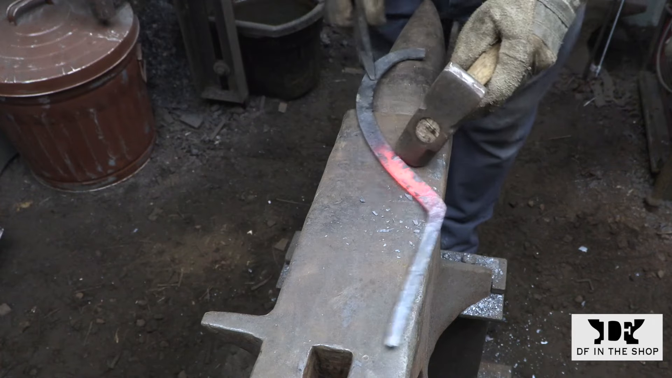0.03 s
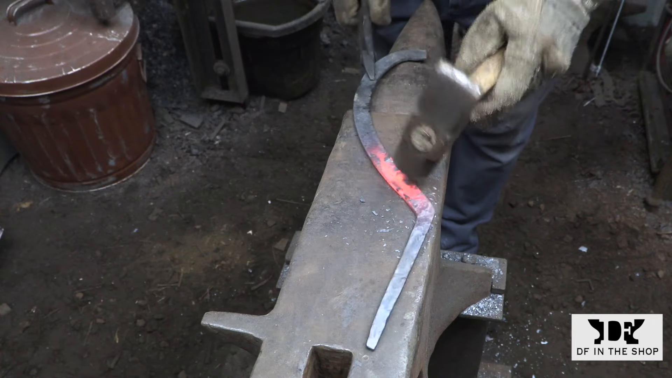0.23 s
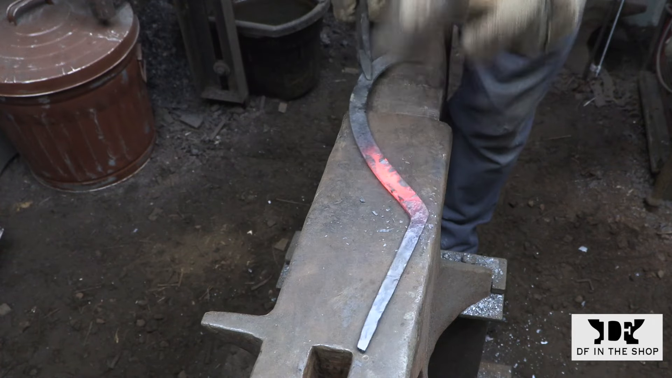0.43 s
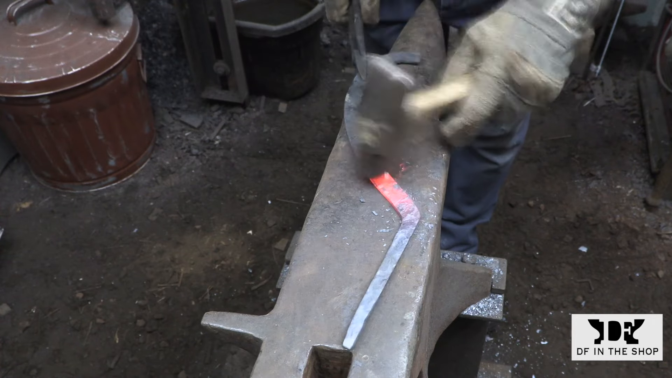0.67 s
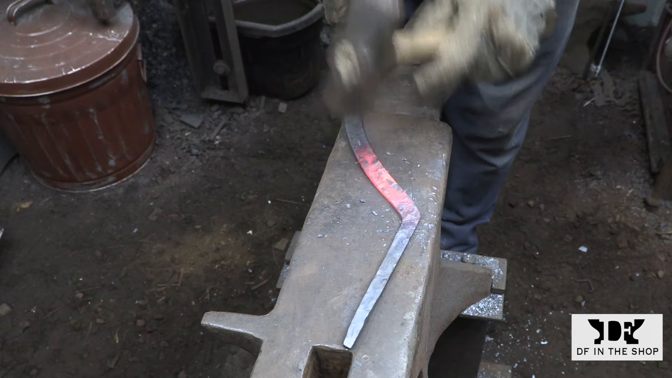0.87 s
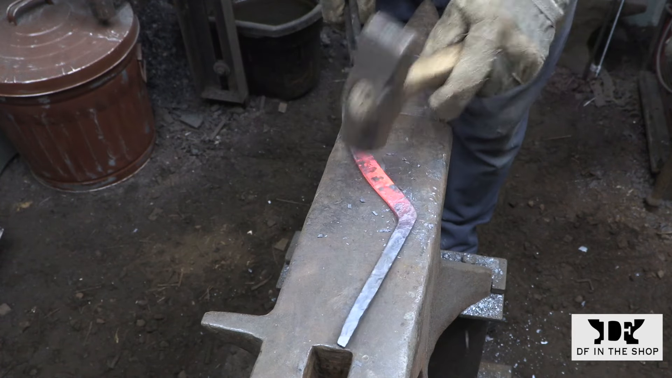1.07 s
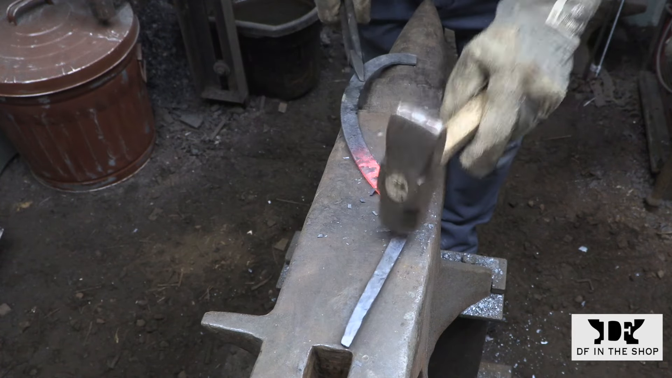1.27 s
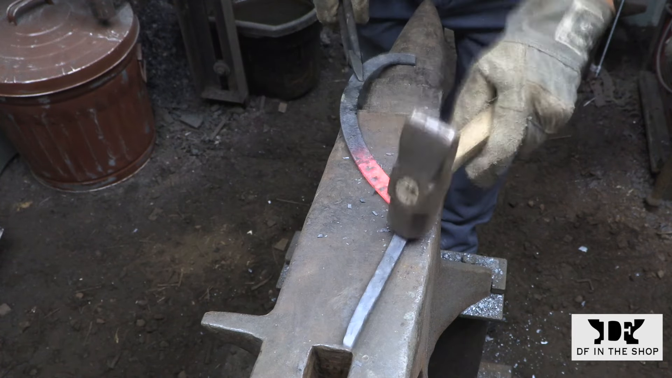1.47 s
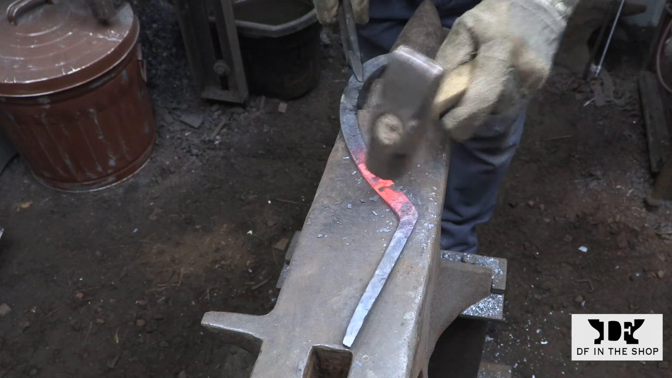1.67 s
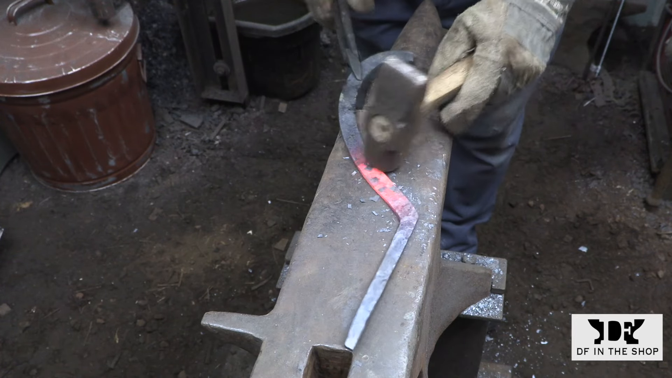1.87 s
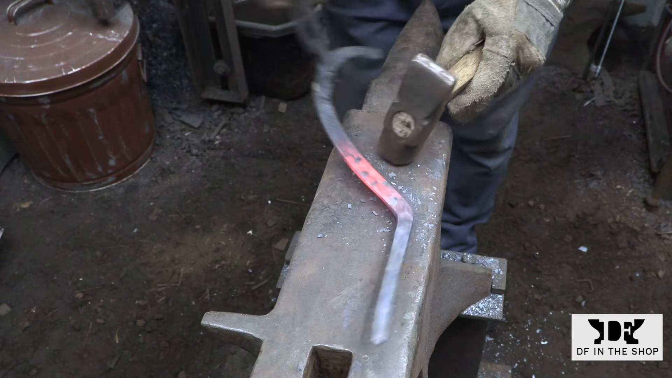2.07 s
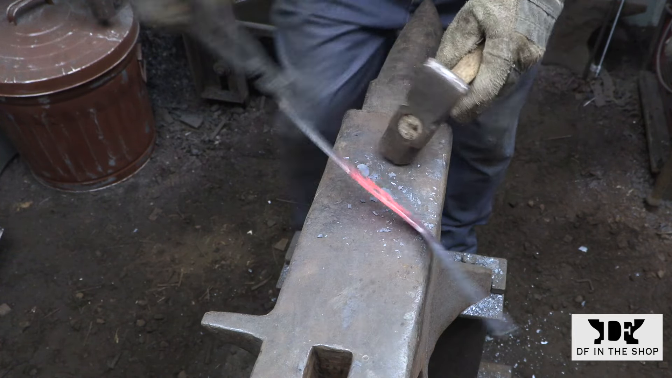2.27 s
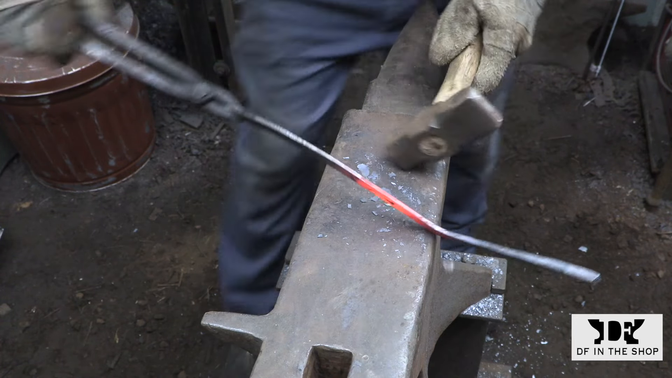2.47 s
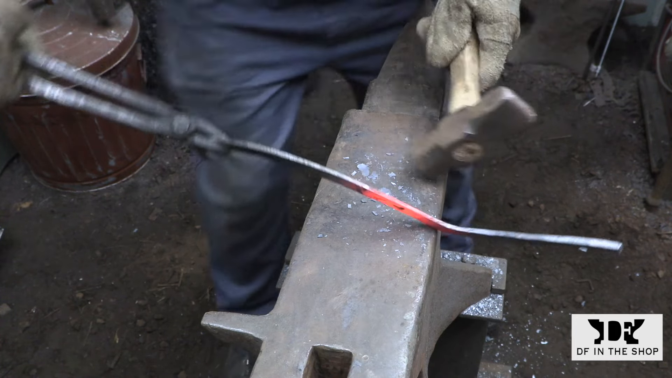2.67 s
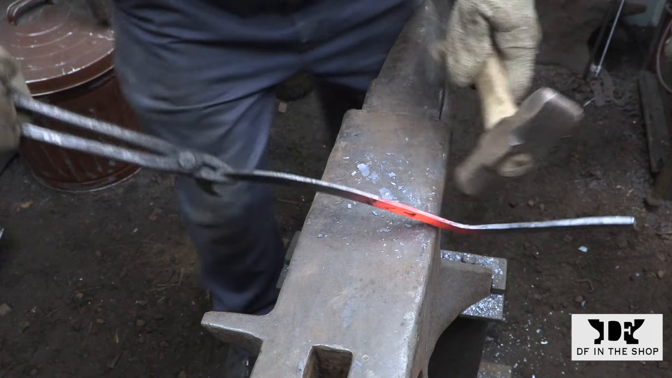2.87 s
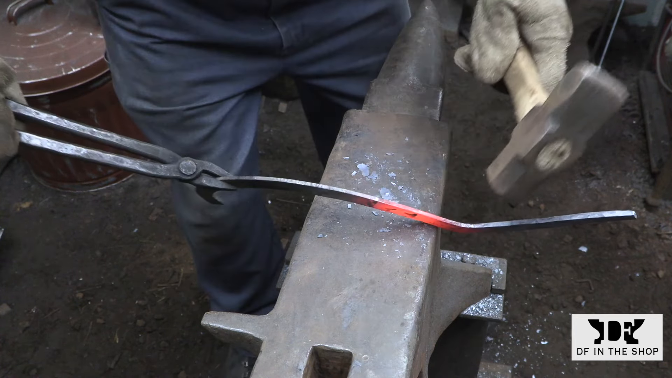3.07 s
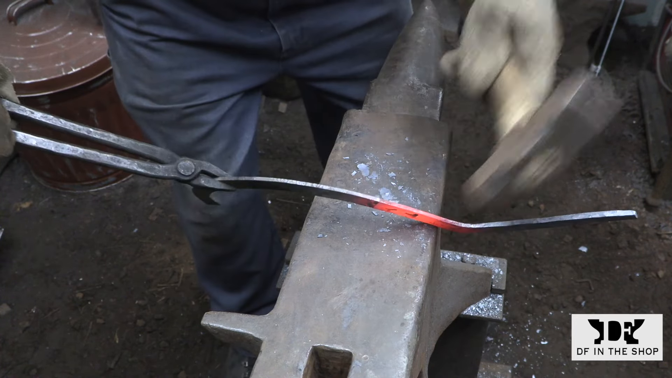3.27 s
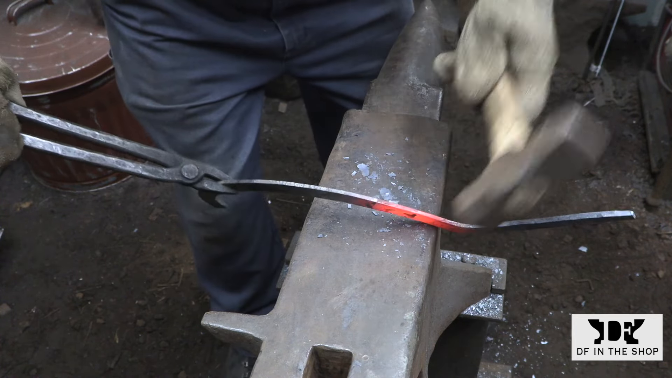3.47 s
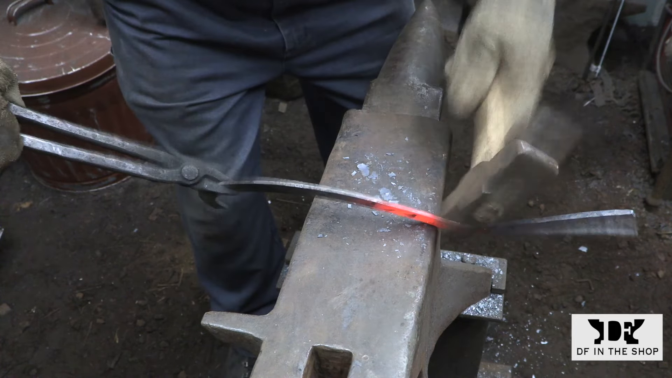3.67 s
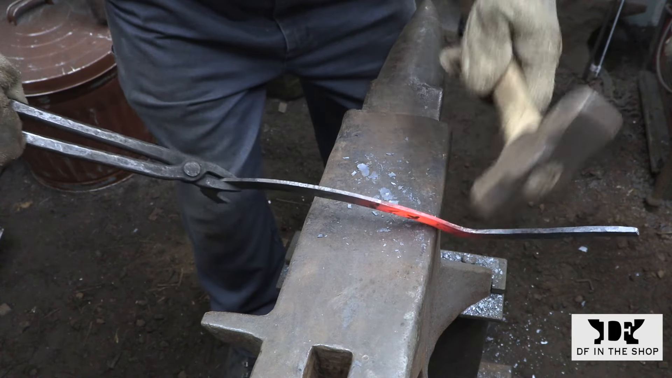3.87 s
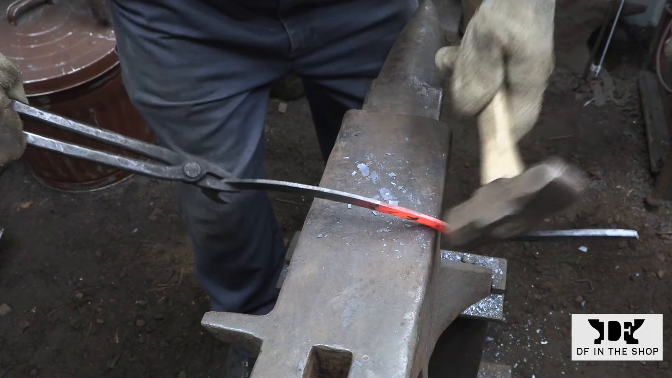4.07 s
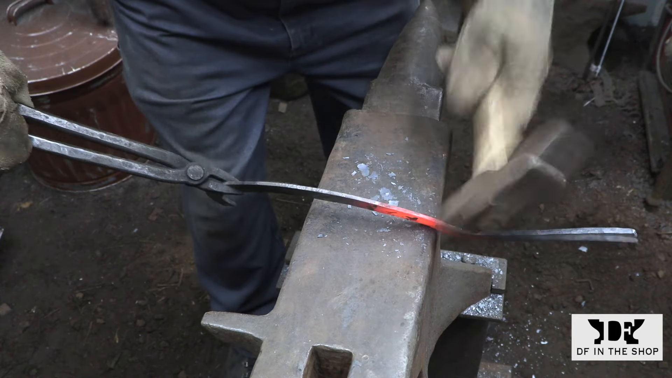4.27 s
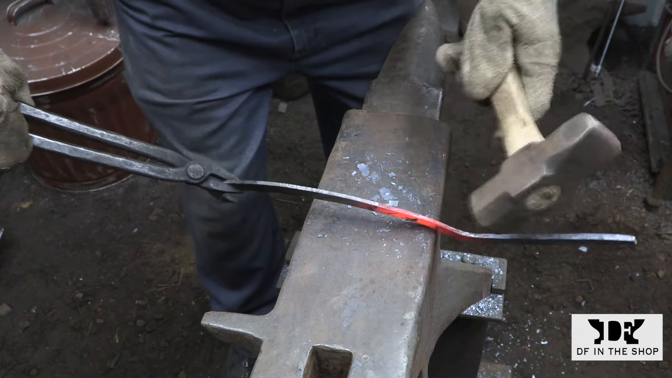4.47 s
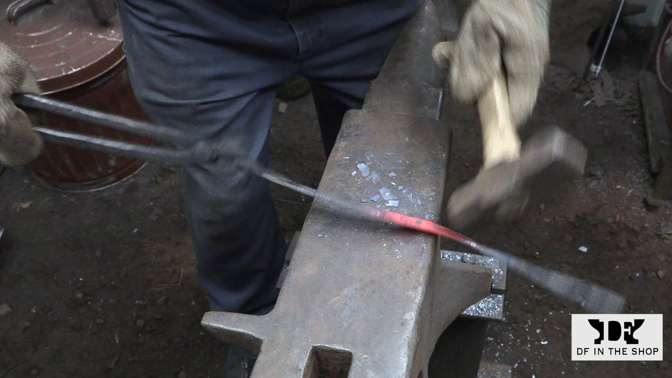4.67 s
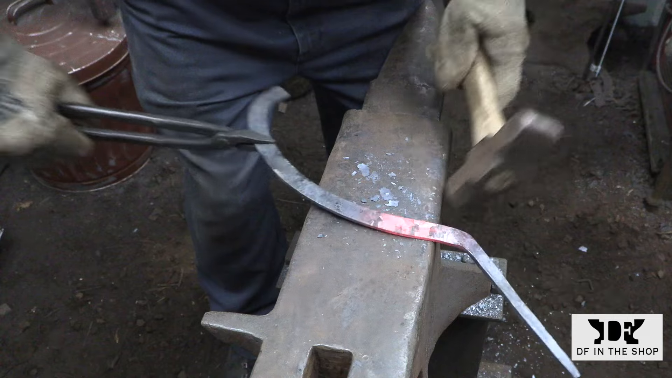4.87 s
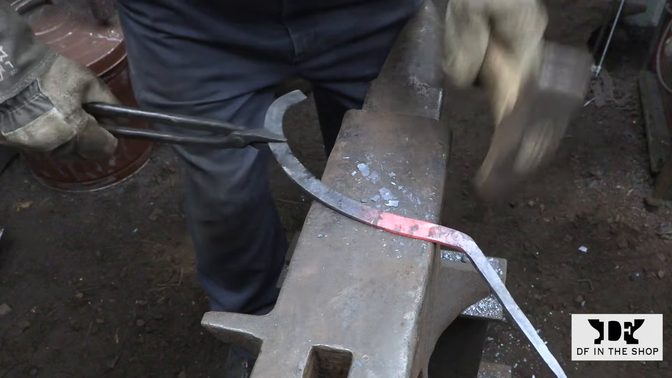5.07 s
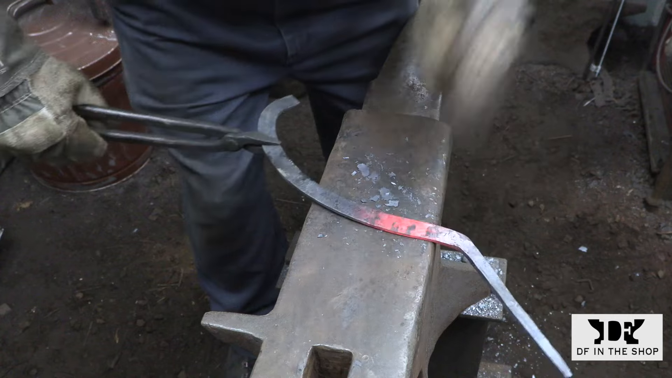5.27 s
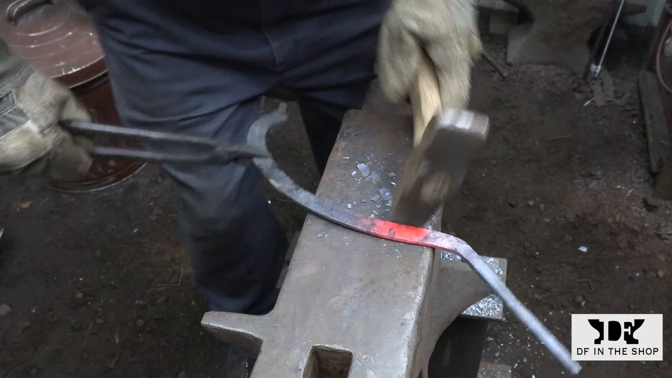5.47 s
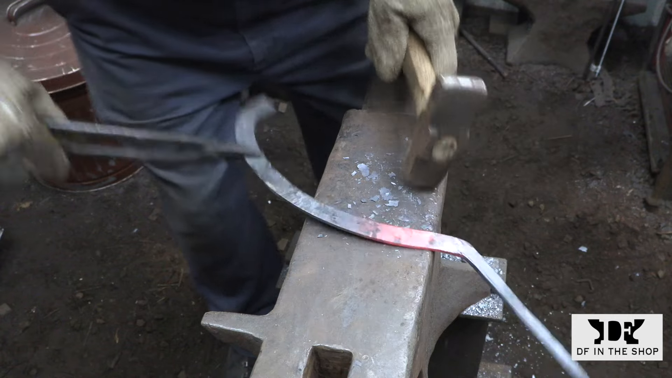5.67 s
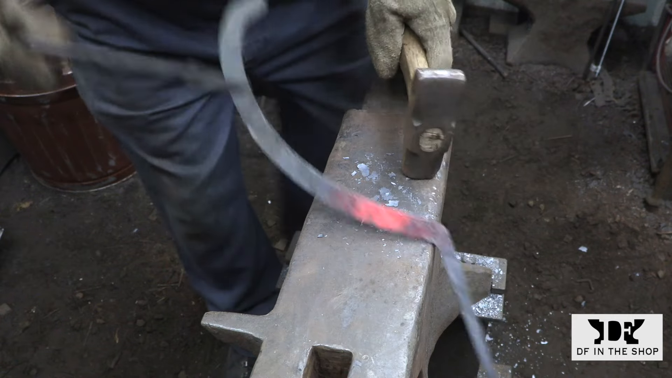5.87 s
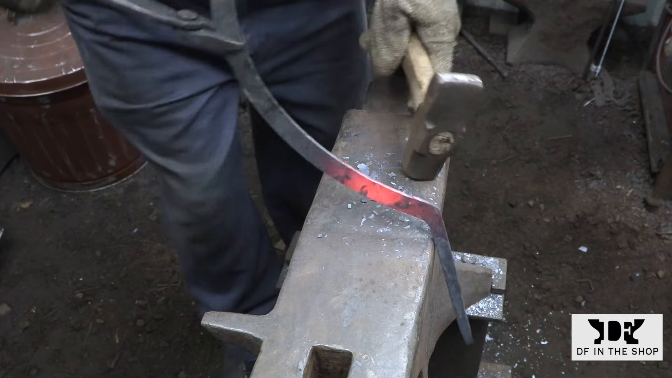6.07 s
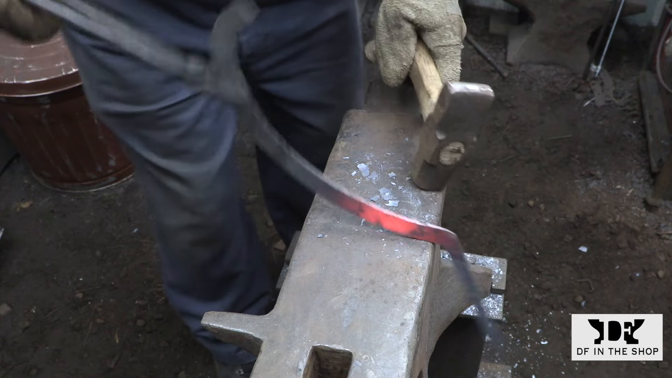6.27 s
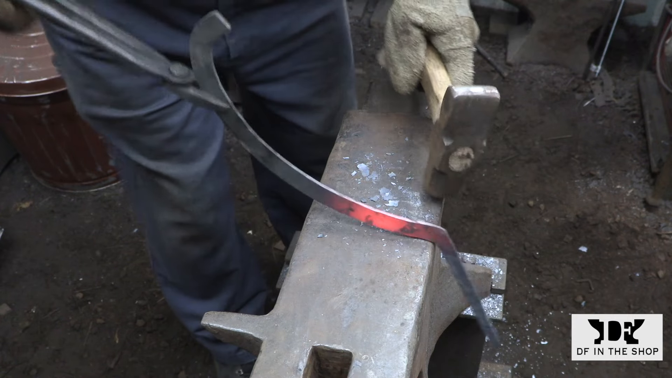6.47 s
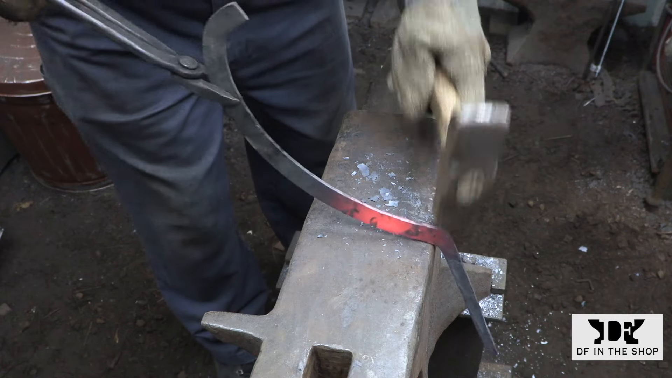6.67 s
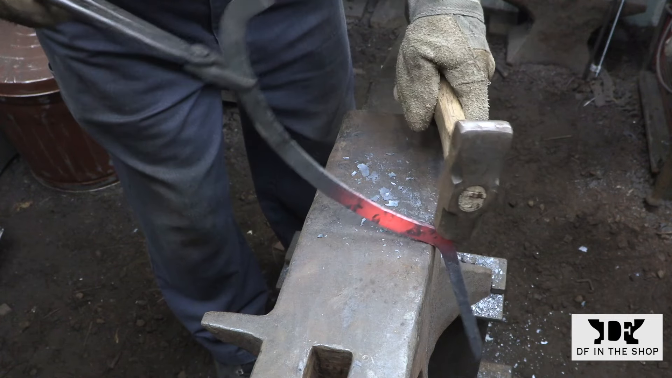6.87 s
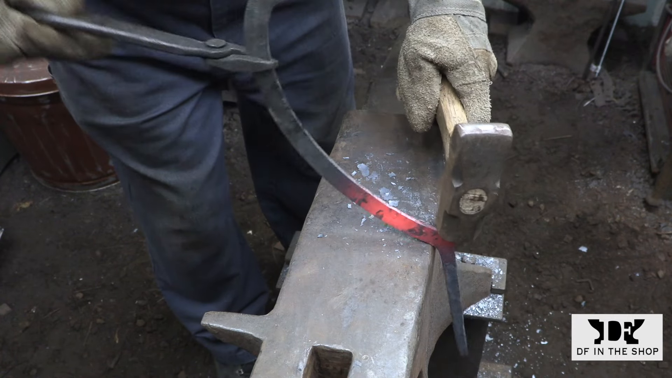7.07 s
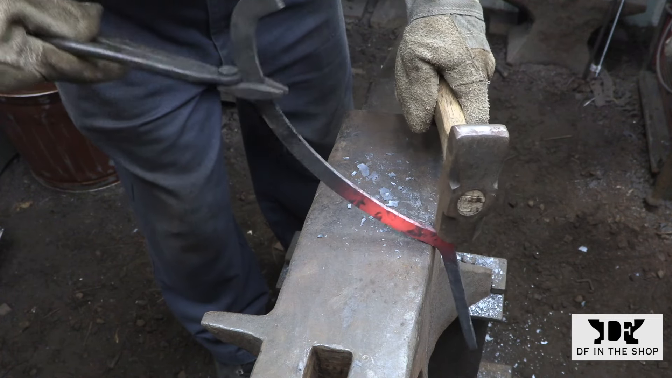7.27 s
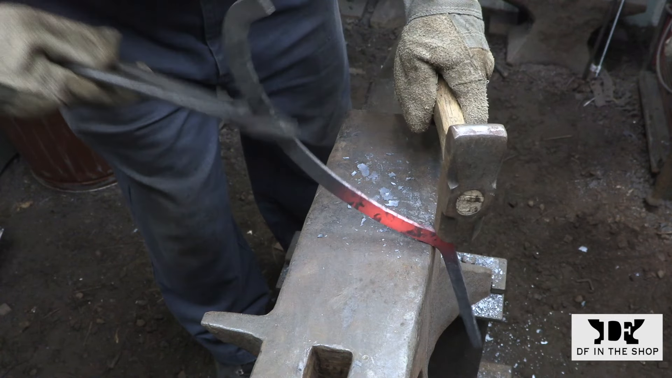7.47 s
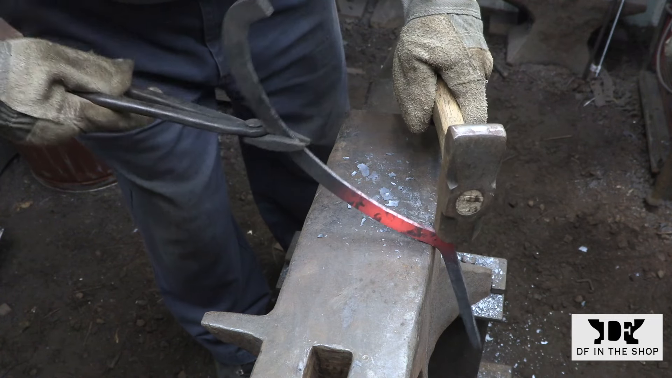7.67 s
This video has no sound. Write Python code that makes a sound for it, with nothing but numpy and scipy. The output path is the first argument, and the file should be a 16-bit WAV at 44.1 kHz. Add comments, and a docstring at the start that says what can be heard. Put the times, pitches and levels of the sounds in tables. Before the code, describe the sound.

Close stereo microphones in a small quiet workshop with faint air noise and hum. After a small foot scuff, a run of bright hammer blows clangs on an anvil, each ring dying quickly. The bar twangs and shifts with light knocks, then a drier, clackier run follows. One hard ringing blow stands out among dull taps, then the bar scrapes across the steel, and a last light tap gives way to soft dragging.

```python
"""A smith hammers a hot steel bar on a well-damped anvil in a small workshop, close to two microphones.
Over faint air noise and a hum, feet shuffle and small contacts knock: grains of noise, and ticks with dying modes.
Then runs of blows: each is a sharp noise crack, a short ring of anvil and hammer, and the clatter of the room.
Between the first two runs the bar twangs, shifts and knocks; in and after the last run come faint swishes, as of
a sleeve, then the dragged bar, in rasp and hiss made of tiny slips. A fast limiter flattens the hard blows."""
import sys
import numpy as np
from scipy import signal
from scipy.fft import rfft, irfft, next_fast_len
from scipy.io import wavfile
from scipy.ndimage import uniform_filter1d

SR = 44100
rng = np.random.default_rng(int(sys.argv[2]) if len(sys.argv) > 2 else 0)


def waveform_to_disk(signal):
    """Save audio, clipped to [-1, 1], as 16-bit WAV at the path in sys.argv[1]."""
    frames = np.transpose(np.atleast_2d(signal))
    scaled = np.clip(frames, -1, 1) * 32767
    samples = np.round(scaled).astype(np.int16)
    wavfile.write(sys.argv[1], SR, samples)


N = 340893

# modes of the anvil and its stand: (frequency [Hz], level [dB], t60 [s])
ANVIL_MODES = [(150, -23, .4), (281, -14, .42), (307, -15, .35), (381, -12, .38), (499, -7, .27),
               (598, -11, .28), (661, -10, .3), (1120, -11, .23), (1232, -8, .22), (1372, -10, .25),
               (1476, -10, .21), (1541, -6, .19), (1556, -2, .24), (2521, -5, .22), (2865, -9, .22),
               (2933, -8, .24), (2984, -7, .23), (3242, -6, .28), (3472, -15, .27), (4764, -19, .19),
               (5569, -14, .22), (6245, -17, .25), (9303, -14, .2), (10960, -27, .21)]
# modes of the tongs and the bar they grip: (frequency [Hz], level [dB], t60 [s])
TONGS_MODES = [(1710, 7.5, 0.11), (2514, 2.5, 0.13), (3430, -3.5, .1), (5650, -5.5, 0.077),
               (5620, 8, 0.024), (6030, -0.5, 0.07), (6540, -9.5, 0.11), (6930, -6, 0.073),
               (7300, -8, 0.12)]


def amp(db):
    """Decibels to gain."""
    return 10 ** (np.asarray(db) / 20)


def unit(x):
    """Scales to rms 1."""
    return x / np.sqrt(np.mean(x ** 2) + 1e-20)


def read(points, hz):
    """Joins (Hz, value) points on a log-frequency axis."""
    f, value = np.transpose(points)
    return np.interp(np.log(hz + 1), np.log(f + 1), value)


def add(mix, s, sound):
    """Adds a stereo sound to the mix at time s."""
    part = mix[:, max(round(s * SR), 0):][:, :sound.shape[1]]
    part += sound[:, :part.shape[1]]


def colour(x, *spectra, size=4096):
    """Causal minimum-phase filter whose gain is the sum of the given dB spectra."""
    hz = abs(np.fft.fftfreq(size, 1 / SR))
    gain_db = sum(read(points, hz) for points in spectra)
    log_gain = np.log(amp(gain_db))
    response = np.exp(np.conj(signal.hilbert(log_gain)))
    taps = np.fft.ifft(response).real[:size // 2]
    return signal.oaconvolve(x, taps[None], axes=1)[:, :x.shape[1]]


def noise(size):
    """White noise as two close microphones hear it: alike in the bass, less so in most of the treble."""
    # likeness of the two microphones: (frequency [Hz], coherence [0-1])
    coherence = [(100, .975), (400, .95), (1000, .86), (2500, .76), (5000, .56), (9000, .7), (13000, .85)]
    padded = next_fast_len(size)
    mid, side = rfft(rng.standard_normal((2, padded)))
    same = np.clip(read(coherence, np.fft.rfftfreq(padded, 1 / SR)), 0, 1)
    mid = mid * np.sqrt((1 + same) / 2)
    side = side * np.sqrt((1 - same) / 2)
    return irfft(np.array([mid + side, mid - side]), padded)[:, :size]


def echoes(under_db=-41, under_t60=0.17, rise_s=0.0027, size=32768):
    """Dense reflections: noise decaying by band, plus a much fainter, duller layer that dies sooner in most."""
    # decay of the workshop: (frequency [Hz], t60 [s])
    room_t60 = [(60, 0.75), (150, 0.37), (400, 0.28), (1500, 0.26), (3000, 0.23), (6000, 0.2), (10000, 0.2),
                (15000, 0.12)]
    hz, t, z = signal.stft(noise(size), SR, nperseg=256)
    main = amp(-60 * t / read(room_t60, hz)[:, None])
    under = amp(under_db - 60 * t / under_t60) / np.hypot(1, hz / 2000)[:, None]
    reflections = signal.istft(z * (main + under), SR, nperseg=256)[1][:, :size]
    return reflections * (1 - np.exp(-np.arange(size) / SR / rise_s))


def ring(modes, t, rise, waver):
    """Dying modes that build up in the room; the spot struck and the moving hammer vary each one."""
    out = np.zeros((2, len(t)))
    for hz, db, t60 in modes:
        phase, offset, beat, turn, spot = rng.random(5)
        beat_hz = 6 + 14 * beat
        swell = 1 + waver * np.sin(2 * np.pi * (beat_hz * t + turn))
        level = amp(db + 6 * (spot - .5) - 60 * t / t60) * swell
        # the phase differs between the microphones, more so at high pitches
        spread = np.array([[-1], [1]]) * (offset - .5) * min(hz / 3000, 1.5)
        out += level * np.sin(2 * np.pi * (hz * t + phase) + spread)
    return out * (1 - np.exp(-t / rise))


def rub(spectrum, grain_db, wet, modes=(), ringing=0, slips_per_s=900):
    """Friction: a stream of tiny slips of uneven size that ring what is rubbed and are blurred by the room."""
    slips = rng.standard_normal(N) * (rng.random(N) < slips_per_s / SR)
    slips *= amp(grain_db * np.minimum(rng.exponential(1, N), 4))
    walls = echoes()
    t = np.arange(walls.shape[1]) / SR
    metal = ring(modes, t, rise=0.0054, waver=0)
    response = wet * unit(walls) + ringing * unit(metal)
    sounding = signal.oaconvolve(unit(slips)[None], response, axes=1)[:, :N] / np.sqrt(walls.shape[1])
    return unit(colour(unit(slips) + sounding, spectrum))


def strokes(rows, attack_s, release_db_per_s):
    """Levels of the low and high layer of a rubbing: each stroke sets in, swells or eases, then dies away."""
    levels = np.zeros((2, N))
    for start, length, low_db, high_db, swell_db in rows:
        t = np.arange(N) / SR - start
        swelling_db = swell_db * (np.clip(t / length, 0, 1) - .5)
        release_db = release_db_per_s * np.maximum(t - length, 0)
        stroke = np.clip(t / attack_s, 0, 1) ** 2 * amp(swelling_db - release_db)
        levels = np.hypot(levels, amp([[low_db], [high_db]]) * stroke)
    return levels


def workshop(hum_hz=120, hum_db=-81, air_db=-70.5):
    """Steady air noise, coloured by the quiet workshop, and a mains hum as one sine."""
    # the quiet workshop: (frequency [Hz], relative density [dB per Hz])
    air = [(15, -53.5), (25, -31), (122, -8), (156, -12.5), (246, -8.5), (782, -11.5), (848, -13.5),
           (1020, -16), (1410, -12), (1710, -13), (4040, -25.5), (6050, -26), (9550, -30), (15500, -42.5)]
    hum = amp(hum_db) * np.sin(2 * np.pi * hum_hz * np.arange(N) / SR)
    return amp(air_db) * unit(colour(noise(N), air)) + hum


def shuffles():
    """Feet scuff the gritty floor and the bar shifts on the anvil: tiny slips in a low bump and a higher grit."""
    # scuffs of a foot, and two short gritty bursts (2.695 and 2.895 s) as the bar shifts on the anvil:
    # (start [s], length [s], bump level [dB], grit level [dB], swell over the stroke [dB])
    scuffs = [(-0.02, 0.032, -50, -51, -9.5), (0.095, .04, -61.5, -60, -2), (0.17, 0.65, -71, -71.5, -4.5),
              (2.455, 0.06, -68.5, -69, 4), (2.52, 0.19, -79, -66.5, 5), (2.695, 0.067, -61, -58.5, 1.5),
              (2.895, 0.064, -55.5, -60.5, 1.5), (3.03, 0.16, -81.5, -68, -11)]
    # low and high part of a scuff or shift: (frequency [Hz], relative density [dB per Hz])
    bump_spectrum = [(120, -26), (230, -11.5), (310, 7.5), (390, -2), (500, 0.5), (680, 1), (900, -40)]
    grit_spectrum = [(500, -7.5), (900, 4), (1700, -0.5), (2800, -3), (4000, -14.5), (8000, -15),
                     (14000, -48)]
    bump = rub(bump_spectrum, grain_db=1, wet=1.2)
    grit = rub(grit_spectrum, grain_db=3.5, wet=1.3)
    bump_level, grit_level = strokes(scuffs, attack_s=0.012, release_db_per_s=170)
    return bump * bump_level + grit * grit_level


def clinks(tick_db=4, bright_modes_db=-13.5):
    """Small contacts of bar, tongs and anvil: a tick of noise starts modes that ring briefly, dull or bright."""
    # dull knocks, a bright clink and a faint tick: (time [s], level [dB], brightness [dB])
    contacts = [(0.082, -58.5, -10), (2.143, -59, -31), (2.3184, -55.5, 5), (2.704, -56, -16),
                (2.917, -50, -26), (7.283, -62, 3)]
    # modes of a contact: (frequency [Hz], level [dB], t60 [s])
    contact_modes = [(1109, -6.5, 0.33), (1599, -6, 0.28), (1960, -17, 0.27), (2260, 1.5, 0.17),
                     (2320, -9, 0.15), (3240, -15, 0.29), (3575, -21, 0.26), (4081, -7, 0.15)]
    # the tick that starts it: (frequency [Hz], relative density [dB per Hz])
    tick_spectrum = [(150, -14), (400, 8.5), (900, 1.5), (2400, 5.5), (6000, -1.5), (9000, -8),
                     (14000, -26)]
    out = np.zeros((2, N))
    for s, db, bright_db in contacts:
        tick = amp(tick_db) * colour(echoes(), tick_spectrum)
        t = np.arange(tick.shape[1]) / SR
        metal = ring(contact_modes, t, rise=0.0083, waver=0.16)
        metal += amp(bright_modes_db) * ring(TONGS_MODES, t, rise=0.0017, waver=0)
        brightness = [(1500, 0), (4500, bright_db)]
        add(out, s, amp(db) * colour(tick + metal, brightness))
    return out


def booms():
    """The corner by the anvil booms and cancels at a few low pitches: narrow peaks and dips (Hz, dB)."""
    # low peaks and dips of the corner: (centre [Hz], width [Hz], level [dB])
    corner = [(151, 24, 9), (172, 19, -8.5), (220.5, 13, -4), (379.2, 26, 5), (490.6, 40, 4),
              (630, 75, -5.5), (1010, 90, -2.5)]
    hz = np.arange(1200)
    gain_db = sum(db / (1 + (2 * (hz - centre) / width) ** 2) for centre, width, db in corner)
    return np.transpose([hz, gain_db])


def blows(crack_db=23, crack_s=0.0038, room_db=15, anvil_db=2, hammer_db=2, shared=0.37):
    """Each blow cracks, fills the room and sets anvil and hammer ringing."""
    # hammer blows and taps: flattening the bar on the face, then the hammer is set down; bending it over
    # the edge, where little rings; one hard blow among dull taps on the bare face, and a last light one:
    # (time [s], force [dB], thud [dB], clang [dB], brightness [dB],
    #  anvil ring re force [dB], hammer ring re force [dB])
    blow_rows = [ (0.6915, -19, -4, 5.5, 9.5, -2, -10.5), (0.9775, -24, -3, 4, 7, -4.5, -16),
                 (1.016, -41, 2, 6, 0.5, 4.5, -20.5), (1.2466, -24.5, -7, 2.5, 7.5, -1, -9.5),
                 (1.512, -27, -6, -0.5, 8, -2, -20.5), (1.77, -36.5, 0.5, 7, 9.5, -3.5, -17),
                 (1.963, -60, 10, 11.5, -15.5, -1, -38), (3.3733, -34, -4, -4.5, 0.5, -9.5, -41),
                 (3.7225, -34, -1.5, -3, 8, -11.5, -50), (4.035, -34.5, 0.5, 3, -3, -9.5, -32),
                 (4.3293, -31, -2.5, -1, 6.5, -10.5, -56), (4.5948, -37, 2, -0.5, 5, -12.5, -17),
                 (4.9611, -36.5, -6.5, 5.5, -31.5, -5.5, -38), (5.3937, -16.5, -8.5, -1, 4, -1, -11.5),
                 (5.6741, -32.5, -6.5, 2, -16, -4.5, -28), (5.835, -41, -5, -1.5, -15, -3, -40),
                 (5.881, -48, 1, 6, -11, -0.5, -21.5), (6.7399, -40.5, -1.5, -3.5, 4.5, -9, -48)]
    # spectrum of a blow: (frequency [Hz], relative density [dB per Hz])
    strike = [(30, -38.5), (65, -16), (100, -23.5), (190, -12.5), (320, 0), (500, 4), (680, 3), (900, -7),
              (1300, 0), (3000, -0.5), (3800, -11.5), (8000, -15.5), (12000, -29.5), (15500, -37)]
    # the direct crack keeps the treble that the walls absorb: (frequency [Hz], gain [dB])
    direct = [(200, 9), (1500, -1), (4000, -1.5), (9000, 7), (14000, -0.5)]
    # high modes of the hammer head: (frequency [Hz], level [dB], t60 [s])
    hammer_modes = [(7450, -8, .2), (7935, 2, .39)]
    out, walls = np.zeros((2, N)), echoes()
    t = np.arange(walls.shape[1]) / SR
    for s, force_db, thud, clang, fizz, ring_db, zing_db in blow_rows:
        # the walls stay put, but each blow lands on a different spot
        room = np.sqrt(shared) * walls + np.sqrt(1 - shared) * echoes()
        burst = np.exp(-t / crack_s) * (1 - np.exp(-t / 0.0018))
        contact = colour(noise(len(t)) * burst, direct)
        # a blow over the edge also rocks the stand: more deep bass the less the anvil rings
        stand = thud - 3 - 0.69 * ring_db
        weight = [(170, stand), (280, thud), (550, thud), (950, clang), (1500, clang), (2100, 0)]
        # bent over the edge, the bar clacks more the less the anvil rings;
        # a hard contact adds a share of its brightness
        clack = -1.1 - 0.45 * ring_db + 0.18 * fizz
        # blows on the scaly bar are bright; taps on the bare face are mostly ring
        brightness = [(3200, 0), (4070, clack), (6500, .5 * fizz), (10000, fizz)]
        crack_and_room = amp(crack_db) * contact + amp(room_db) * room
        body = colour(crack_and_room, strike, booms(), weight, brightness)
        # a duller contact also wakes the high modes less
        softened = [(7000, 0), (9000, .7 * fizz)]
        anvil = colour(ring(ANVIL_MODES, t, rise=.003, waver=.45), weight, softened)
        hammer = ring(hammer_modes, t, rise=0.005, waver=0.2)
        ringing = amp(anvil_db + ring_db) * anvil + amp(hammer_db + zing_db) * hammer
        add(out, s, amp(force_db) * (body + ringing))
    return out


def twangs():
    """The bar springs free as it is lifted or shifted, and its loose end hums briefly in bending modes."""
    # twangs of the bar: (time [s], level [dB])
    twang_rows = [(1.964, -42.5), (2.141, -56.5), (2.922, -52)]
    # bending modes of the bar: (frequency [Hz], level [dB], t60 [s])
    bar_modes = [(379, 0, .42), (660, -9, .3), (940, -10, .22), (1180, -4, .28), (1350, -6, .25),
                 (1950, -9, .25)]
    out, t = np.zeros((2, N)), np.arange(SR) / SR
    for s, db in twang_rows:
        add(out, s, amp(db) * ring(bar_modes, t, rise=0.018, waver=0.3))
    return out


def slides():
    """Faint swishes, then steel dragged over steel: tiny slips in a rasp with anvil modes and a higher hiss."""
    # faint swishes, as of a sleeve, then the bar dragged over the anvil or turned in the tongs:
    # (start [s], length [s], rasp level [dB], hiss level [dB], swell over the stroke [dB])
    drags = [(5.13, 0.12, -72, -72, 0), (5.26, 0.1, -73, -77, -4), (6.01, 0.13, -62, -70, 8),
             (6.075, .16, -43.5, -58, -3.5), (6.37, 0.14, -75.5, -75, -4), (7.17, 0.12, -70, -60.5, 6),
             (7.365, 0.19, -62.5, -60.5, 8)]
    # low and high part of a stroke: (frequency [Hz], relative density [dB per Hz])
    rasp_spectrum = [(88, -73.5), (150, -42), (323, -11), (373, -9.5), (640, -13.5), (1440, -5.5),
                     (1590, 0.5), (1780, -7), (2240, -4), (4500, -24), (5850, -60.5), (9900, -120)]
    hiss_spectrum = [(1760, -20), (3000, -8.5), (3230, -7), (3650, -14.5), (3950, -8), (7810, -6.5),
                     (12100, -20.5), (15000, -39.5)]
    rasp = rub(rasp_spectrum, grain_db=3.5, wet=1.3, modes=ANVIL_MODES, ringing=.15)
    hiss = rub(hiss_spectrum, grain_db=3, wet=1.3, modes=TONGS_MODES, ringing=1.1)
    rasp_level, hiss_level = strokes(drags, attack_s=0.036, release_db_per_s=240)
    return rasp * rasp_level + hiss * hiss_level


def scene():
    """The smith's sounds slightly to the right, in the centred air and hum of the workshop."""
    smith = shuffles() + clinks() + blows() + twangs() + slides()
    pan = amp([[-.5], [.5]])
    return workshop() + smith * pan


def record(dry, limit_db=-24.5, ratio=14, release_db_per_s=260, attack_s=0.0009, edge_hz=15800):
    """A fast limiter holds hard blows level until they die down; the peaks round off; then the band limit."""
    r = np.exp(-1 / (attack_s * SR))
    power = signal.lfilter([1 - r], [1, -r], (dry ** 2).mean(0))
    power_db = 10 * np.log10(power + 1e-14)
    # the detector follows each rise and falls no faster than a steady rate
    fall = np.arange(N) * release_db_per_s / SR
    peak_db = np.maximum.accumulate(power_db + fall) - fall
    over_db = np.maximum(peak_db - limit_db, 0)
    held = dry * amp(-(1 - 1 / ratio) * uniform_filter1d(over_db, 40))
    rounded = .25 * np.tanh(held / .25)
    low_pass = signal.firwin(511, edge_hz, window=("kaiser", 9), fs=SR)
    return signal.oaconvolve(rounded, low_pass[None], "same")


dry = scene()
out = record(dry)
waveform_to_disk(out)
```